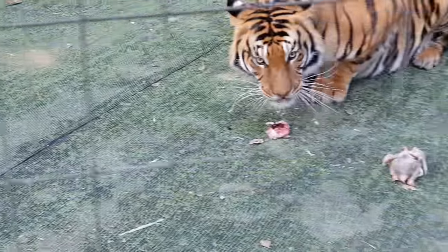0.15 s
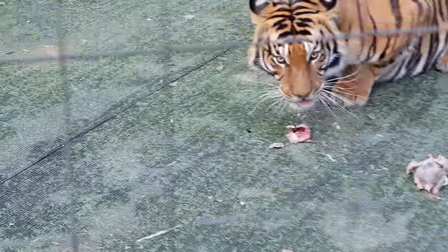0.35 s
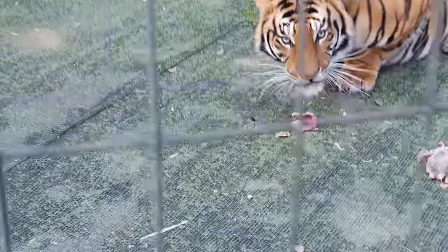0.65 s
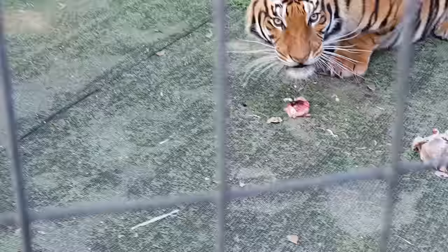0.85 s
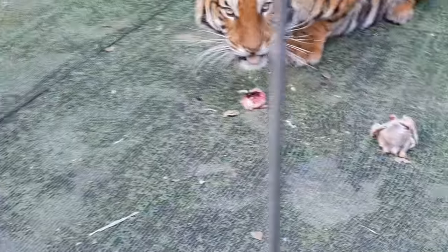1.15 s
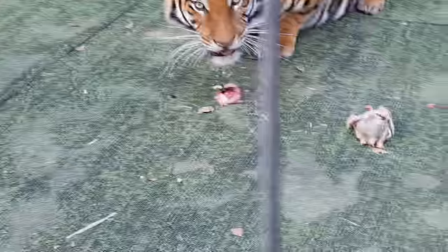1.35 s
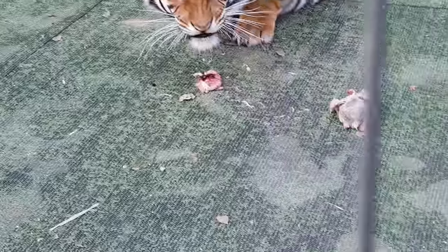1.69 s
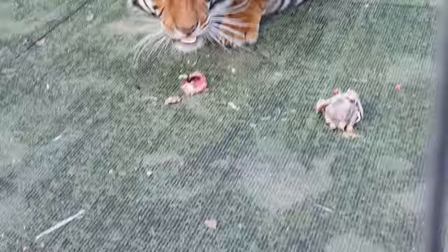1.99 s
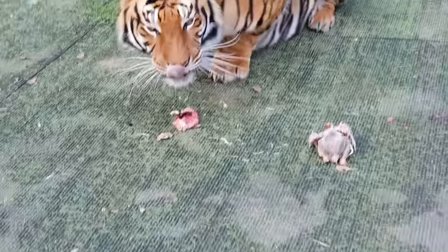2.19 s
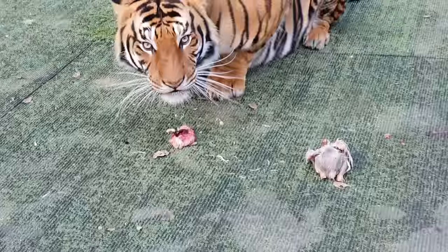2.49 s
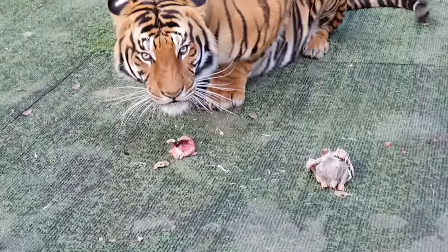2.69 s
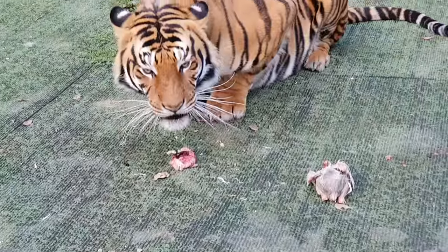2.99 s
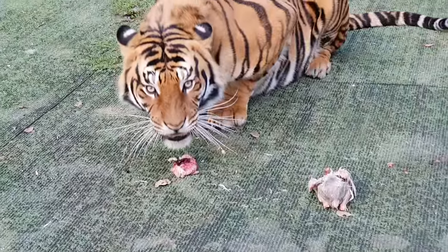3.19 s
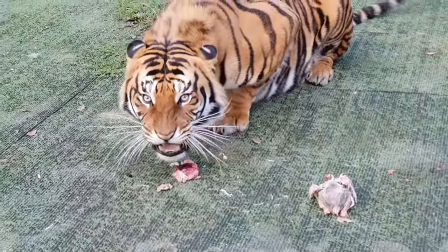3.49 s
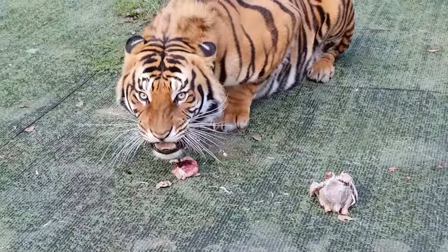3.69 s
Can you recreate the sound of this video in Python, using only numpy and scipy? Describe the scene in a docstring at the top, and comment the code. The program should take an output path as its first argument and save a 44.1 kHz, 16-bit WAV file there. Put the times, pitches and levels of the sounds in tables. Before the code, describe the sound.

Close to the microphone, a tiger gives a deep, pulsing growl with occasional breathy huffs and lip smacks. It dies down, then the animal grunts and snarls loudly, over faint outdoor background noise.

```python
"""Tiger growling over its meat

A quiet yard, microphone close to the fence. The tiger, a little to the left, gives a long low rumble,
a short grunt, then a loud snarl, and huffs and smacks its mouth now and then. Its slack vocal folds
flap mostly 25-50 times a second; each flap thumps the chest and lets air rasp through the throat."""
import sys
import numpy as np
from scipy import signal
from scipy.fft import rfft, irfft, next_fast_len
from scipy.io import wavfile
from scipy.ndimage import uniform_filter1d, map_coordinates

SR = 44100
rng = np.random.default_rng(int(sys.argv[2]) if len(sys.argv) > 2 else 0)


def store_pcm(level_fs):
    """Save levels as 16-bit WAV."""
    pcm = np.round(np.clip(level_fs, -1, 1) * 32767).astype(np.int16)
    wavfile.write(sys.argv[1], SR, np.atleast_2d(pcm).T)


N = 169785

# throat resonances moving with the larynx: t/s, frequency factor
THROAT_GLIDE = [(.6, 1.05), (1.48, 1.14), (1.62, 1.0), (3.17, 0.95), (3.3, 1.075), (3.43, 1.038),
                (3.5, 0.94), (3.6, 1.0)]


def amp(db):
    """Decibels to gain."""
    return 10 ** (np.asarray(db) / 20)


def unit(x):
    """Scale to rms 1."""
    return x / np.sqrt(np.mean(x ** 2) + 1e-20)


def clock():
    """The time of each sample."""
    return np.arange(N) / SR


def along(points, hz):
    """Interpolate (f/Hz, value) points on a log frequency axis."""
    f, values = np.transpose(points)
    return np.interp(np.log(hz + 1), np.log(np.sort(f) + 1), values)


def gains(rows):
    """One gain curve per dB column, fading out beyond the first and last row."""
    s, *columns = np.transpose(rows)
    t = clock()
    fade = np.clip(1 + np.minimum(t - s[0], s[-1] - t) / .015, 0, 1)
    return [fade * amp(np.interp(t, s, db)) for db in columns]


def swells(rows):
    """One gain curve per dB column from bell-shaped swells (t/s, half length/s, level/dB, ..)."""
    bells = np.array([np.exp(-((clock() - s) / half) ** 2) for s, half, *_ in rows])
    return amp(np.array(rows)[:, 2:]).T @ bells


def colour(x, spectrum):
    """Ring x through a causal filter of unit energy: the spectrum sets only the shape."""
    size = 16384
    cepstrum = irfft(np.log(amp(along(spectrum, np.fft.rfftfreq(size, 1 / SR)))))
    cepstrum[1:size // 2] *= 2  # fold to minimum phase
    cepstrum[size // 2 + 1:] = 0
    ring = irfft(np.exp(rfft(cepstrum)))
    return signal.fftconvolve(x, ring / np.linalg.norm(ring))[:len(x)]


def cavity(x, spectrum, glide):
    """Ring x in a cavity whose resonances all move by the glide curve."""
    warped = np.cumsum(np.clip(np.interp(clock(), *np.transpose(glide)), .5, 2))
    steady = np.interp(np.arange(int(warped[-1])), warped, np.arange(N))
    ringing = colour(map_coordinates(x, [steady]), spectrum)
    return map_coordinates(ringing, [warped])


def air(spectrum, gate=1):
    """Turbulent air, gated and then shaped by a spectrum."""
    return colour(gate * rng.standard_normal(N), spectrum)


def outdoors():
    """Faint, low outdoor noise, partly common to both sides of the microphone."""
    # ambience: f/Hz, level/dB
    spectrum = [(20, -28.5), (55, 13), (500, -12.5), (800, -23.5), (1300, -24), (2600, -39), (5000, -39),
                (7500, -44), (9000, -35.5), (15500, -62)]
    common = air(spectrum)
    sides = np.array([air(spectrum), air(spectrum)])
    return amp(-47) * unit(common + 1.21 * sides)


def yard(x):
    """The direct sound, a little to the left, and a short scatter from floor and fence."""
    # left over right: f/Hz, level/dB
    balance = [(100, 0.84), (1100, 3.8), (6500, 4.3), (8300, 13), (12000, 1.2)]
    # scatter against direct sound: f/Hz, level/dB
    scatter = [(100, -37), (400, -7), (1000, -2.5), (2500, -5.5), (8000, -7.5), (14000, 8)]
    t60_s = 0.063
    size = next_fast_len(N + SR // 2)
    hz, t = np.fft.rfftfreq(size, 1 / SR), np.arange(SR // 3) / SR
    tail = rng.standard_normal((2, len(t))) * amp(-60 * t / t60_s)
    echo = rfft(tail / np.linalg.norm(tail[0]), size) * amp(along(scatter, hz))
    sides = amp(np.outer([.5, -.5], along(balance, hz)))
    return irfft(rfft(x, size) * (1 + echo) * sides / sides.mean(axis=0), size)[:, :N]


def spit(depth_db):
    """Saliva breaks the air stream up: a gain that flutters within milliseconds."""
    flutter = unit(uniform_filter1d(rng.standard_normal(N), size=90))
    return unit(amp(depth_db * flutter))


def huffs():
    """Air from nose and throat: a hiss and wheeze under the rumble, with a few sharper puffs."""
    # puffs: t/s, half length/s, rush/dB, hiss/dB
    puff_swells = [(.39, 0.11, -54.5, -87), (1.025, 0.033, -46, -61.5), (1.04, 0.15, -56, -69.5),
                   (2.563, 0.027, -57.5, -65.5)]
    # breath spectra: f/Hz, level/dB
    rush_shape = [(150, -27), (300, 8), (1300, 3.5), (3000, -9.5), (7500, -27.5), (10000, -98)]
    hiss_shape = [(4000, -48), (9000, 5.5), (12500, 1), (15500, -13)]
    nose_shape = [(5000, -54), (7800, -13.5), (8700, 3.5), (12500, -8.5), (15500, -13)]
    wheeze_shape = [(300, -30.5), (700, 20.5), (1500, 6), (2200, 1.5), (2800, 6), (3600, -5.5),
                    (4800, -5.5), (6500, -28), (9000, -59)]
    # breath strength: t/s, level/dB
    nose_level = [(0, -74), (.17, -80.5), (.26, -72), (.55, -76), (.85, -76), (1.13, -85), (1.85, -81.5),
                  (2.35, -75.5), (2.85, -79), (3.0, -75)]
    wheeze_level = [(0, -57.5), (.2, -65), (.55, -58.5), (.85, -67.5), (1.2, -63), (1.7, -75.5),
                    (3.0, -67.5)]
    rush, hiss = swells(puff_swells)
    puffs = air(rush_shape, rush * spit(depth_db=5.0)) + air(hiss_shape, hiss)
    return puffs + air(nose_shape, gains(nose_level)[0]) + air(wheeze_shape, gains(wheeze_level)[0])


def smacks():
    """Tongue, lips or throat part wetly and ring the mouth for a moment."""
    # mouth clicks and throat slaps: t/s, level/dB, f/Hz, t60/s
    clicks = [(.389, -28.5, 850, 0.0057), (0.431, -31, 1230, 0.0049), (.433, -43.5, 393, 0.022),
              (1.201, -36, 1080, 0.0041), (2.544, -41.5, 490, 0.0073), (3.107, -28, 1890, .012),
              (3.112, -21.5, 556, 0.011), (3.146, -28, 1920, 0.013), (3.478, -22.5, 8270, 0.0059),
              (3.49, -19, 1960, 0.007), (3.509, -12, 525, 0.005)]
    # mouth modes: multiple of f, gain/dB
    modes = [(.5, -5.5), (0.999, 16), (1.45, -2.5)]
    out, t = np.zeros(N + SR), np.arange(SR // 20) / SR
    attack_s = 0.0016
    for s, db, hz, t60 in clicks:
        ring = sum(amp(level) * np.sin(2 * np.pi * (hz * k * t + rng.random())) for k, level in modes)
        out[int(s * SR):][:len(t)] += amp(db - 60 * t / t60) * (1 - np.exp(-t / attack_s)) * ring
    return out[:N]


def flaps(rate, jitter_s=.0003):
    """Times at which the vocal folds slap shut."""
    s, hz = np.transpose(rate)
    t = np.arange(s[0], s[-1] + .01, 1 / SR)
    turns = np.cumsum(np.interp(t, s, hz)) / SR
    times = np.interp(np.arange(int(turns[-1]) + 1), turns, t)
    return times + jitter_s * rng.standard_normal(200)[:len(times)]


def slaps(times, scatter_db, second, lag_s, lag_spread):
    """Impulses of mean power 1: each flap and two ever weaker slaps after it."""
    size, extra, late = rng.standard_normal((200, 3))[:len(times)].T
    lag = lag_s * np.exp(lag_spread * late)
    at = np.r_[times, times + lag, times + 2 * lag]
    first = amp(scatter_db * size)
    height = np.r_[first, second * first * amp(scatter_db * extra), second ** 2 * first]
    height *= np.sqrt((times[-1] - times[0]) * SR / np.sum(height ** 2))
    return np.bincount(np.clip(at * SR, 0, N).astype(int), height, N + 1)[:N]


def bursts(thumps, width_s, delay_s, leak):
    """The air flow: a rounded burst at each slap over a steady leak."""
    t = np.arange(-SR // 40, SR // 40) / SR
    bell = np.exp(-((t - delay_s) / width_s) ** 2)
    power = np.abs(signal.fftconvolve(thumps ** 2, bell / bell.sum(), "same"))
    return np.sqrt((power + leak ** 2) / (1 + leak ** 2))


def excite(thumps, flow, slap):
    """Clean slaps (slap is their share of the power) mixed with bursts of turbulent air."""
    return np.sqrt(slap) * thumps + np.sqrt(1 - slap) * flow * rng.standard_normal(N)


def rumble():
    """Mouth nearly shut: each flap thumps the chest, with a rasp and wet ticks when the lips part."""
    # flap rate: t/s, f/Hz
    rate = [(0.0, 33.62), (0.12, 29.79), (0.27, 26.33), (0.42, 29.75), (0.53, 27.64), (0.7, 28.95),
            (0.83, 26.81), (1.15, 29.45), (1.4, 29.44), (1.62, 27.9), (1.76, 24.92), (2.0, 27.82),
            (2.3, 26.42), (2.5, 23.78), (2.95, 22.4)]
    # second slap of a flap: t/s, lag/s
    lag = [(0, 0.0066), (1.45, 0.00747), (1.62, .0098), (1.8, .008)]
    # chest drive: t/s, level/dB
    level = [(0, -32.5), (.3, -38.5), (.6, -41.5), (.95, -40.5), (1.16, -38.5), (1.5, -37.5), (1.75, -42),
             (2.33, -43.5), (2.5, -43), (2.68, -56), (2.98, -69)]
    # lips parting: t/s, half length/s, throat/dB, mouth/dB, tick/dB
    partings = [(.6, 0.22, -56.5, -64, -99), (1.17, 0.11, -63, -63.5, -80), (1.5, .045, -61, -82, -107),
                (1.605, 0.09, -50.5, -57.5, -62), (2.43, 0.12, -61.5, -71, -76)]
    # resonances: f/Hz, level/dB
    chest_shape = [(20, -60), (40, -9), (60, 5), (84, 9), (114, 10.5), (150, 3.5), (180, 5.5), (215, -4.5),
                   (270, -6.5), (330, -23), (800, -47), (3000, -110)]
    throat_shape = [(200, -45), (380, -10), (500, -10.5), (600, -1.5), (700, -8.5), (830, -19.5),
                    (3500, -81.5)]
    mouth_shape = [(800, -14), (1400, 4.5), (1650, -5), (2100, 6.5), (2400, -5), (3000, -14), (4100, -12.5),
                   (7500, -34), (8500, -20), (15000, -84)]
    tick_shape = [(900, -19), (1900, -17), (2700, -3), (3500, 8.5), (5500, -18), (7400, -21), (8500, -3.5),
                  (14000, -35)]
    # moving chest resonances: t/s, frequency factor
    chest_glide = [(0, 0.89), (.4, 1.01), (1.45, 1.08), (1.9, 1.016)]
    chest, = gains(level)
    throat, mouth, tick = swells(partings)
    times = flaps(rate)
    lag_s = np.interp(times, *np.transpose(lag))
    thumps = slaps(times, scatter_db=.8, second=.68, lag_s=lag_s, lag_spread=.08)
    murmur = amp(-12) * rng.standard_normal(N)
    flow = bursts(thumps, width_s=0.0028, delay_s=0.00044, leak=0.21)
    body = cavity((thumps + murmur) * chest, chest_shape, chest_glide)
    throat_drive = excite(thumps, flow, slap=0.42) * (throat + amp(-44) * chest)
    rasp = cavity(throat_drive, throat_shape, THROAT_GLIDE)
    breath = air(mouth_shape, flow * mouth)
    ticks = colour(excite(thumps, flow, slap=.5) * tick, tick_shape)
    return body + rasp + breath + ticks


def open_growl(level, thumps, flow, mouth_shape, slap):
    """Mouth open: slaps and air bursts sound chest, throat and mouth, and hiss between the teeth."""
    # resonances: f/Hz, level/dB
    chest_shape = [(20, -104), (42, -4), (72, -2), (112, 2), (155, 2.5), (190, -9), (240, -4.5),
                   (330, -16.5), (480, -21.5), (800, -30.5), (1500, -52), (6000, -110)]
    throat_shape = [(200, -60), (350, -5.5), (450, -1), (520, 3), (590, 5.5), (680, -2.5), (760, 1),
                    (880, -20), (1020, -10.5), (1400, -51), (3500, -111)]
    teeth_shape = [(5000, -66), (7600, -1.5), (8400, 7.5), (9800, 6.5), (11500, -3.5), (13000, -10),
                   (15500, -21)]
    # mouth resonances moving with the jaw: t/s, frequency factor
    jaw_glide = [(3.02, 0.91), (3.19, 1.175), (3.3, 1.02), (3.37, 0.99), (3.44, 0.99), (3.499, 0.97),
                 (3.588, 1.014), (3.85, 0.97)]
    chest, throat, mouth, hiss = gains(level)
    body = colour(thumps * chest, chest_shape) + amp(-9) * air(chest_shape, chest)
    roar = cavity(excite(thumps, flow, slap) * throat, throat_shape, THROAT_GLIDE)
    rattle = cavity(excite(thumps, flow, slap) * mouth * spit(depth_db=3.5), mouth_shape, jaw_glide)
    return body + roar + rattle + air(teeth_shape, flow * hiss * spit(depth_db=3))


def grunt():
    """A short push with quick flaps, every other one weak."""
    # flap rate: t/s, f/Hz
    rate = [(2.99, 55.4), (3.08, 49.51), (3.17, 51.72), (3.26, 25.08)]
    # drive: t/s, chest/dB, throat/dB, mouth/dB, hiss/dB
    level = [(2.97, -47, -74, -70.5, -83), (3.06, -36, -40, -46.5, -63), (3.112, -26, -35, -42, -57),
             (3.165, -28.5, -36, -41.5, -58), (3.205, -39, -47, -61.5, -66.5),
             (3.3, -28.5, -62, -71.5, -85)]
    # mouth resonances: f/Hz, level/dB
    mouth_shape = [(900, -15), (1340, 3), (1600, -7), (1880, 6.5), (2200, -1), (2550, -9), (2800, -7),
                   (3600, -18), (4900, -17), (5500, -14.5), (7000, -31), (9000, -81)]
    times = flaps(rate)
    odd_flap = np.searchsorted(times[1:] - .005, clock()) % 2
    alternate = amp(-5.0 * (odd_flap - .5))  # strong and weak lie 5 dB apart
    thumps = alternate * slaps(times, scatter_db=-2.5, second=0.33, lag_s=0.0053, lag_spread=0.18)
    flow = bursts(thumps, width_s=0.0018, delay_s=0.0039, leak=0.91)
    return open_growl(level, thumps, flow, mouth_shape, slap=0.051)


def snarl():
    """The loud outburst with bared teeth, slowing to a rumble while air whistles past the fangs."""
    # flap rate: t/s, f/Hz
    rate = [(3.28, 27.37), (3.33, 43.82), (3.39, 40.2), (3.42, 51.29), (3.45, 56.74), (3.485, 71.6),
            (3.51, 54.26), (3.55, 55.97), (3.6, 39.35), (3.67, 38.52), (3.72, 33.25), (3.85, 28.51)]
    # drive: t/s, chest/dB, throat/dB, mouth/dB, hiss/dB
    level = [(3.305, -33.5, -43.5, -48.5, -62.5), (3.37, -23.5, -31, -32.5, -46),
             (3.44, -23, -35.5, -31, -41), (3.505, -18, -30, -32, -46), (3.575, -27, -39.5, -33, -49.5),
             (3.68, -27.5, -39.5, -41, -59.5), (3.76, -33, -45.5, -50, -66.5),
             (3.85, -34, -46.5, -53.5, -64)]
    # resonances: f/Hz, level/dB
    mouth_shape = [(900, -21), (1340, -4.5), (1520, -5), (1930, 3), (2120, -2), (2400, 9.5), (2660, -6.5),
                   (2920, 2), (3150, -6), (3450, -1), (3700, -8.5), (4000, 2.5), (4300, -2.5), (4700, -4.5),
                   (5100, -7.5), (5600, -7.5), (7200, -23), (9000, -63)]
    fang_shape = [(3600, -42), (4700, -4), (5900, -36)]
    thumps = slaps(flaps(rate), scatter_db=1.8, second=0.45, lag_s=0.00731, lag_spread=0.3)
    flow = bursts(thumps, width_s=.003, delay_s=.002, leak=.28)
    whistle = amp(-33) * air(fang_shape, gains(level)[0])
    return open_growl(level, thumps, flow, mouth_shape, slap=0.045) + whistle


def scene():
    """The tiger at close range in its yard, over faint outdoor noise."""
    return outdoors() + yard(rumble() + grunt() + snarl() + huffs() + smacks())


def record(dry):
    """The recorder keeps nothing above its band limit."""
    top_hz = 15750
    size = next_fast_len(N + SR // 2)
    passband = np.fft.rfftfreq(size, 1 / SR) < top_hz
    return irfft(rfft(dry, size) * passband, size)[:, :N]


dry = scene()
out = record(dry)
store_pcm(out)
```